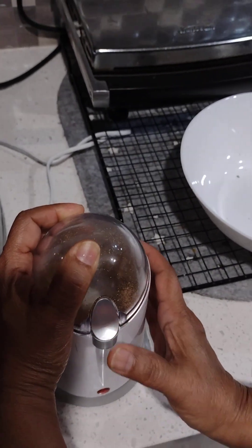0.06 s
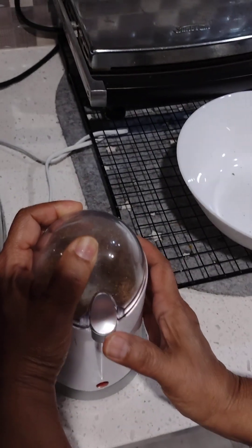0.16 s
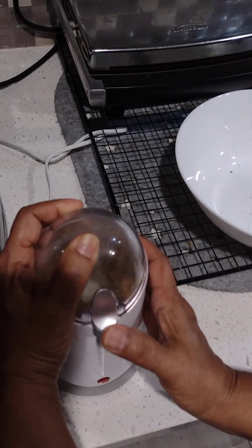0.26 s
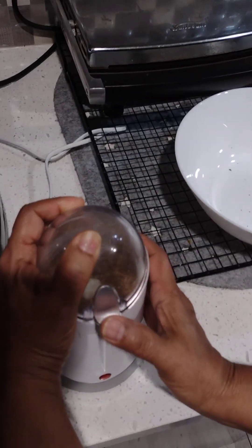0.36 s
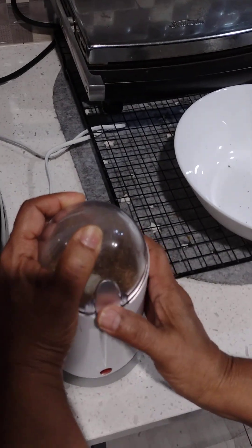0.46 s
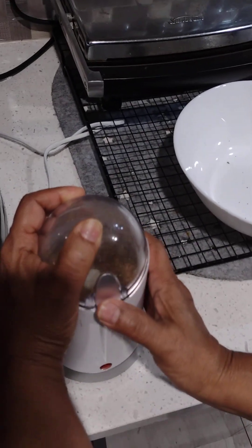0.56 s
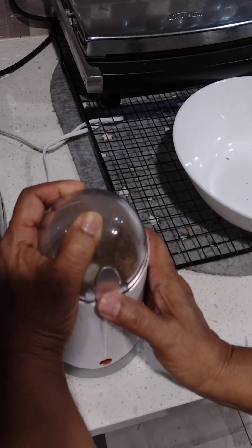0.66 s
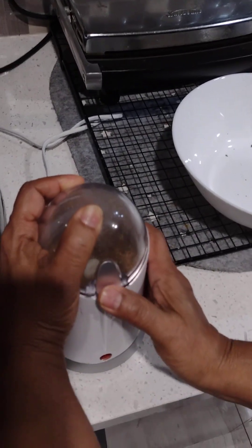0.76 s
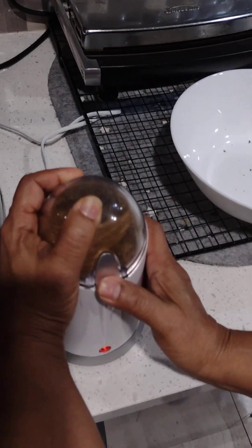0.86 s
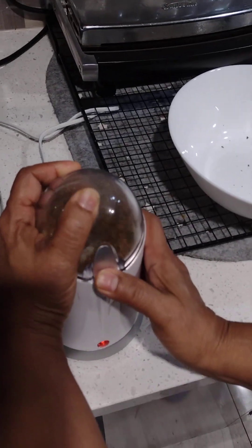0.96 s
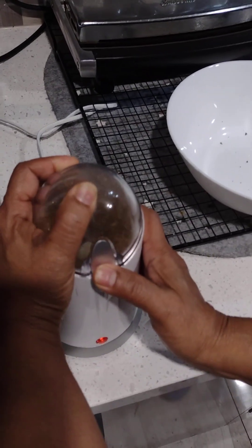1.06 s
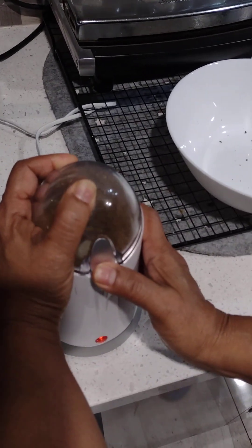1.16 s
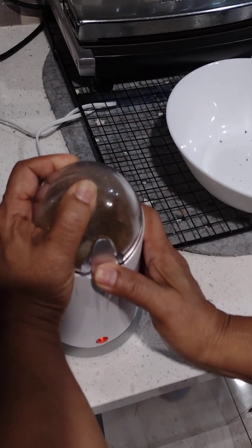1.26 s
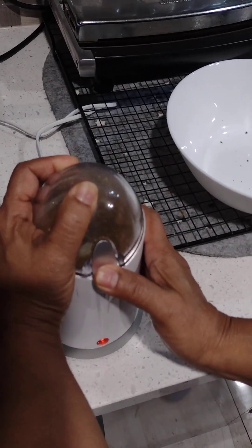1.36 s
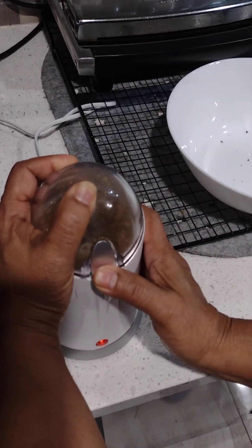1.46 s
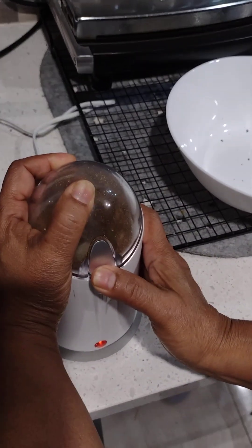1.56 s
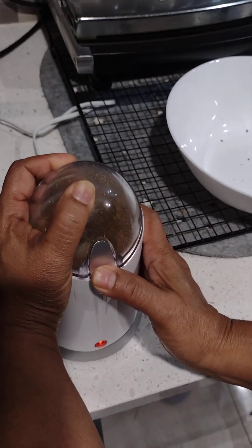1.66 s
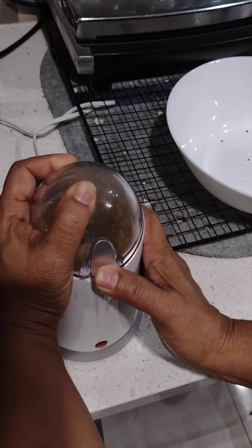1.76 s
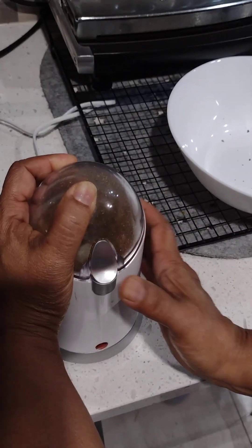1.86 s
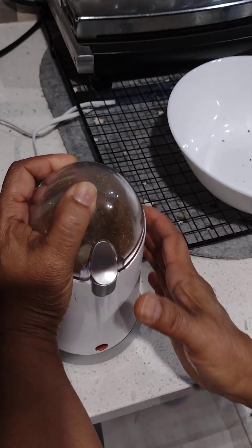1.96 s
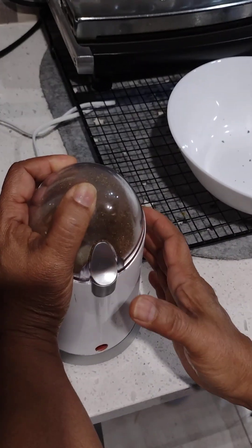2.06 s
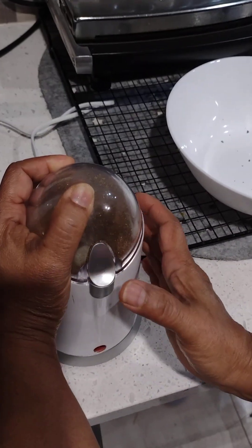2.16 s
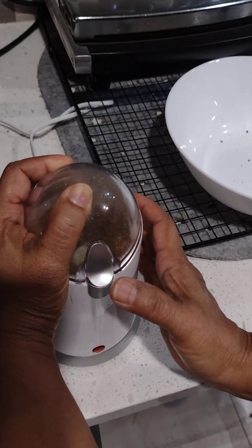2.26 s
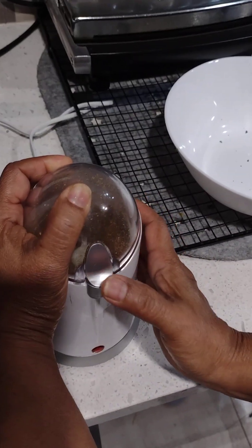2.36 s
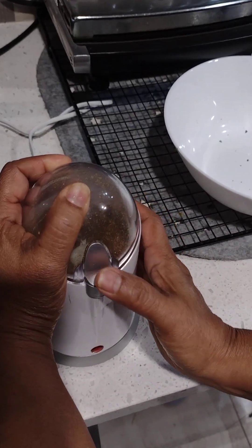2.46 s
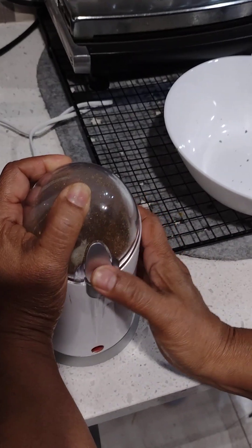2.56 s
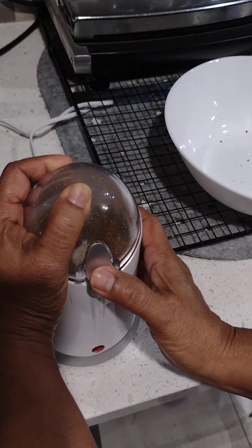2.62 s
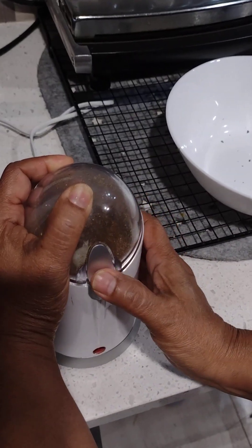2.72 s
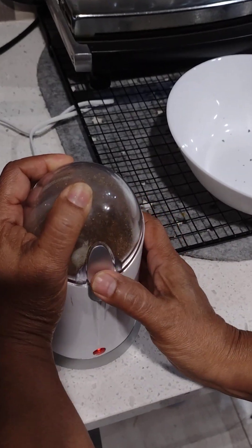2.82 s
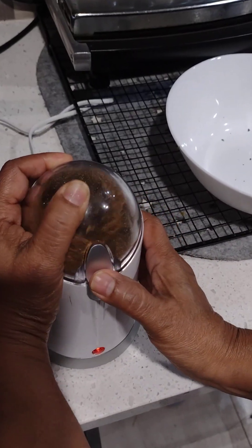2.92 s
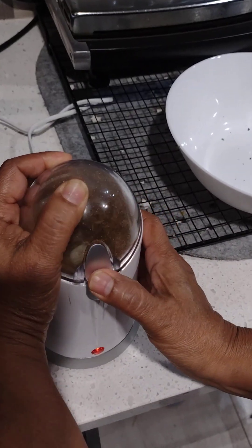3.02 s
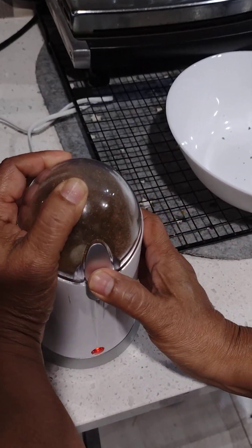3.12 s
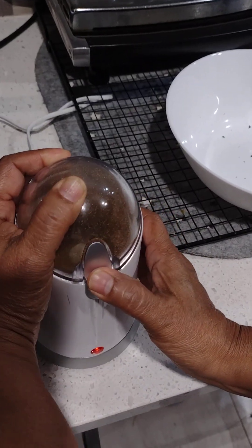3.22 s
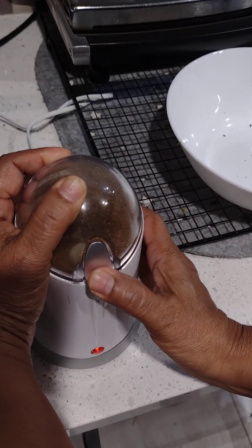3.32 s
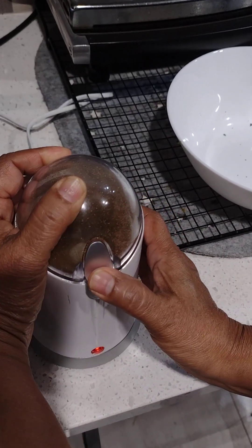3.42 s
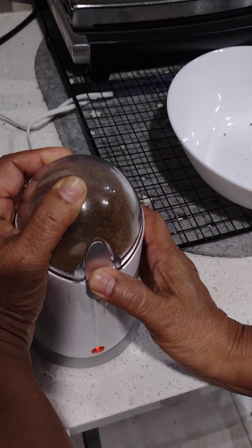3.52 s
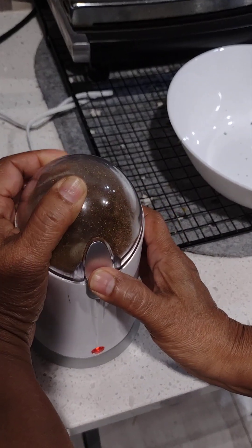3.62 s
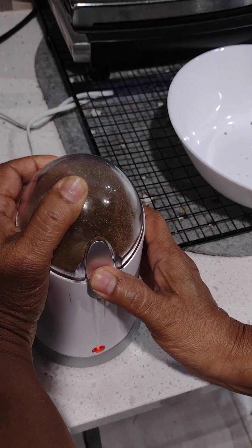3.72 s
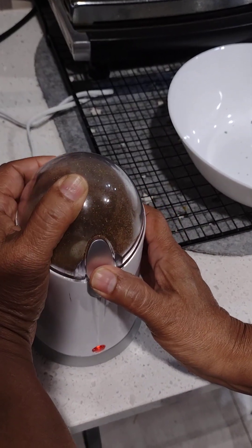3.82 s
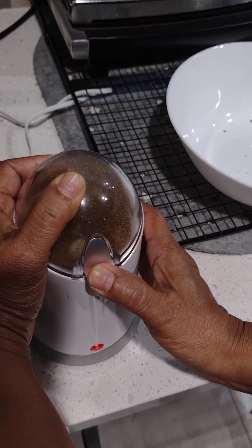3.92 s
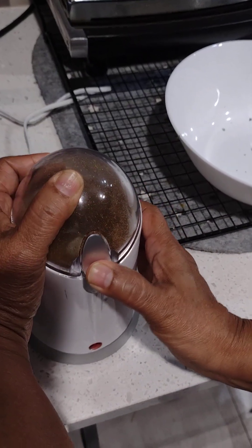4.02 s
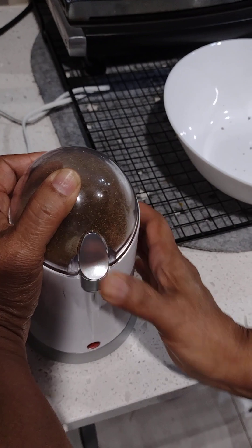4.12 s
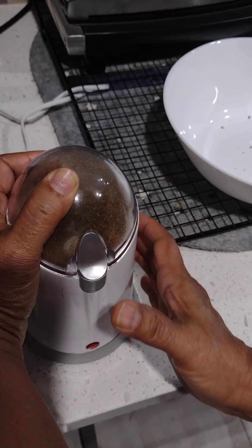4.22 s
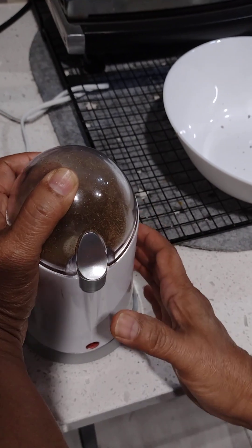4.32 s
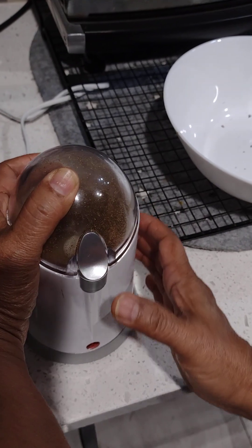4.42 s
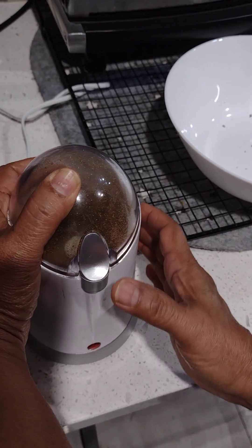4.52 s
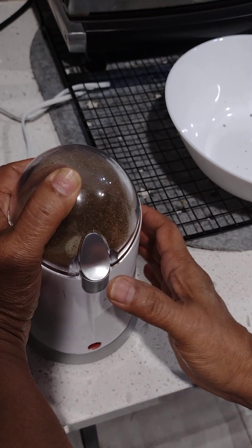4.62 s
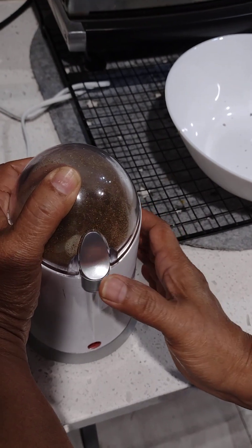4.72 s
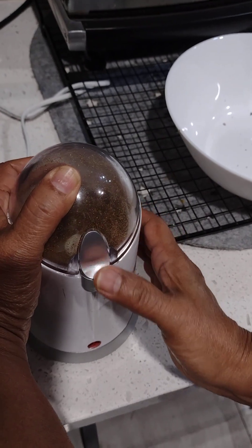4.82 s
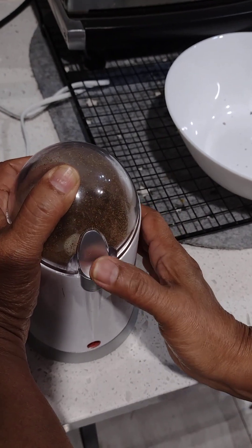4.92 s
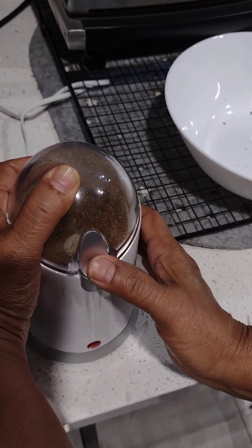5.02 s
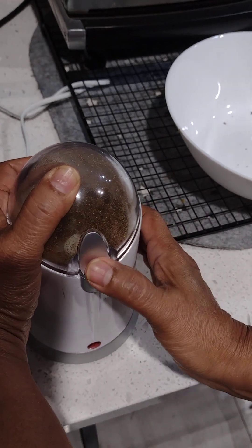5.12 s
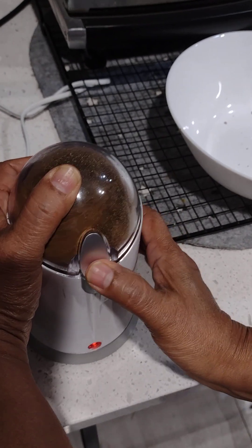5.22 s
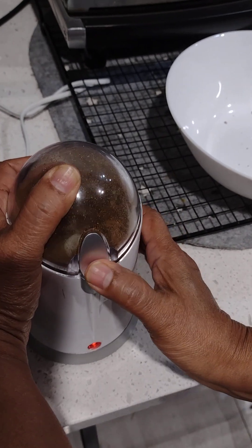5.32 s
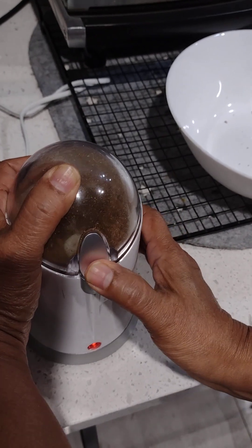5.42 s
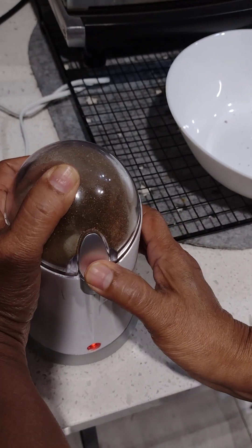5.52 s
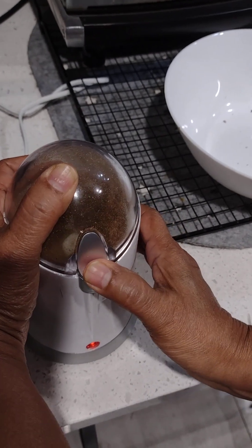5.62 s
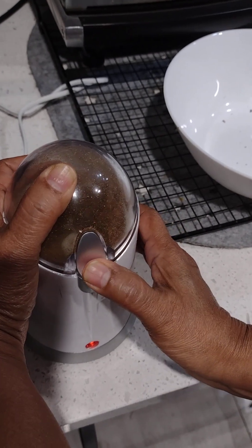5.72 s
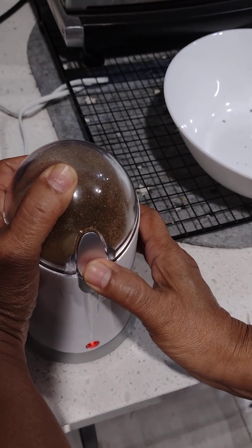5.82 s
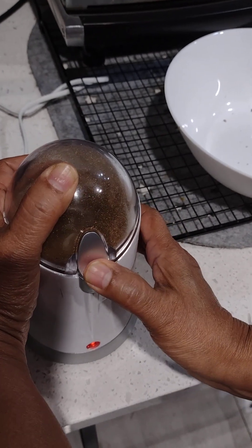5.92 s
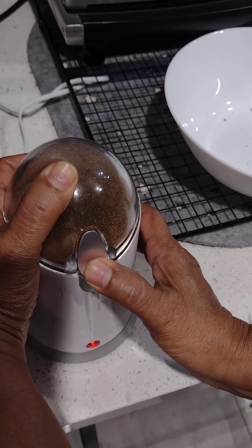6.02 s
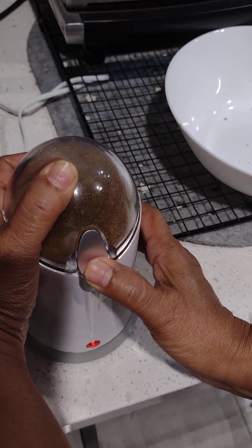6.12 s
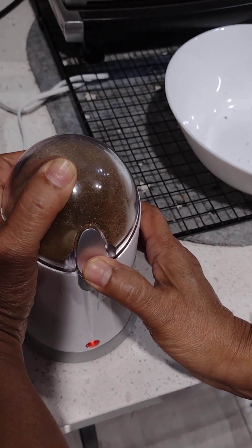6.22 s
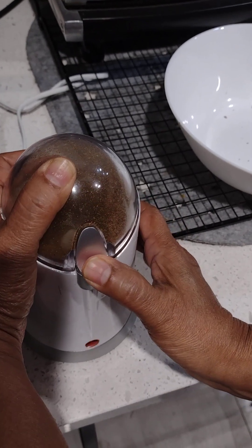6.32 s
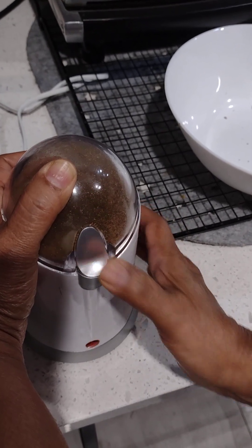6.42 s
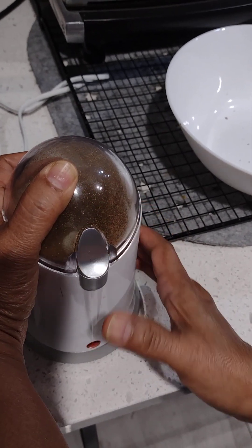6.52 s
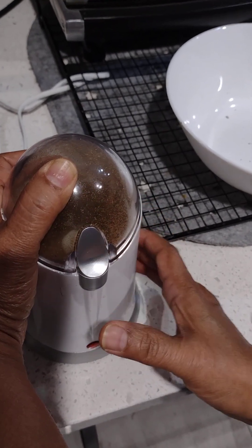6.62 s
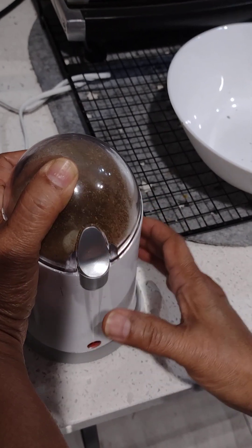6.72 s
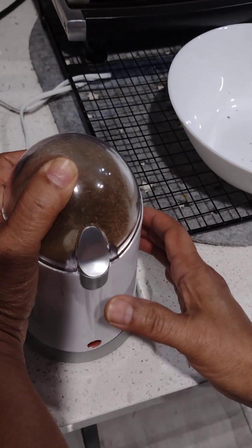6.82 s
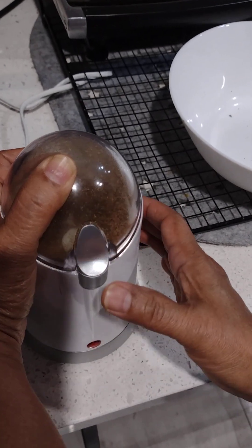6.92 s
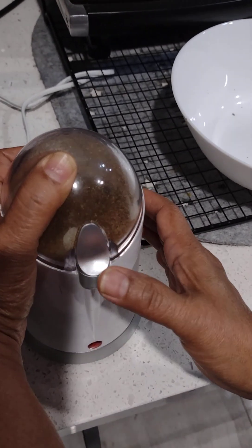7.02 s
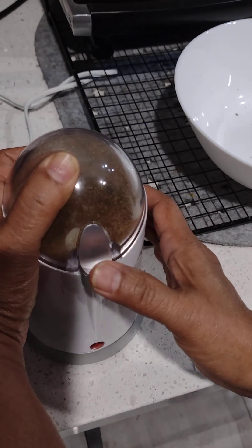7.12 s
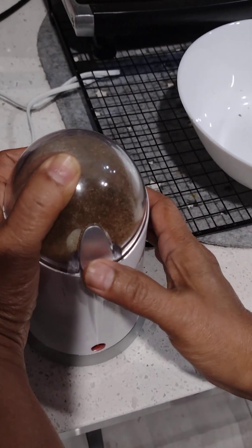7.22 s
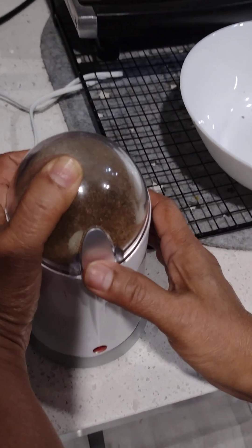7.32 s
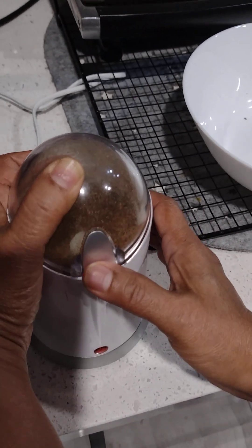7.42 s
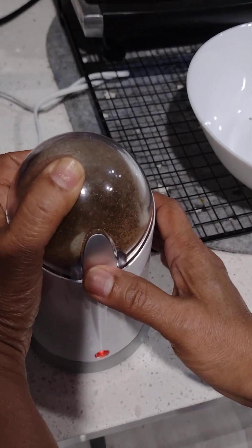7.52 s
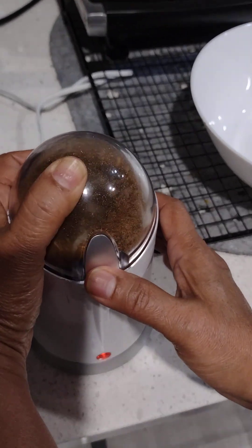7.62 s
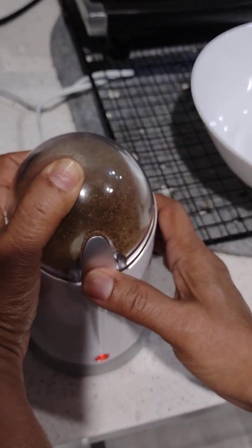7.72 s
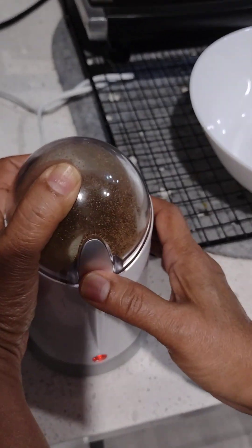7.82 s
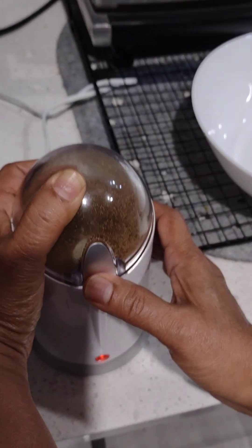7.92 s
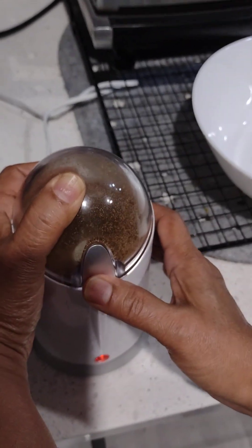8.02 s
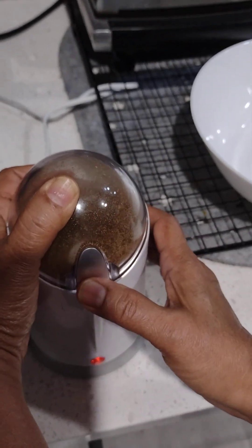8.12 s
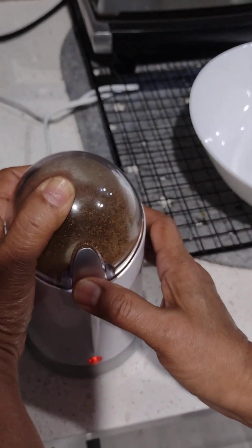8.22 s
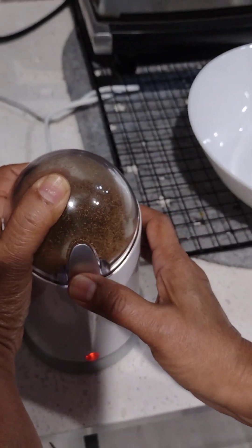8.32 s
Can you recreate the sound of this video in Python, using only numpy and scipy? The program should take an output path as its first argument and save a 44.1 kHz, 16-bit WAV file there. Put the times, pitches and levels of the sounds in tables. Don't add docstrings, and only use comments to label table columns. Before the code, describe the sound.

Close, slightly hollow stereo in a quiet kitchen with a short hard echo. At 0 s an earlier burst is already coasting down, coarse and loud with cracking lumps, stopping by about 0.4 s with a soft straggler. Faint room noise follows. At 0.9 s the grinder kicks in with knocks, spinning up within half a second to a buzzy motor whine, mains hum and gritty bright hiss, with several sharp cracks; power drops at 1.8 s and the pitch falls to a shuddering stop near 2.4 s. The second pulse runs 2.95 to 4.1 s, whining loudest, stopping around 4.7 s with small ticks. A light button rattle comes at 5.1 s. The third runs 5.3 to 6.4 s, finer and smoother, winding down to a clear last click near 6.85 s. The fourth starts at 7.6 s, with strong housing vibration, and is still at full speed when the sound ends around 8.4 s.

```python
import sys
import numpy as np
from scipy import signal
from scipy.fft import rfft, irfft, next_fast_len
from scipy.io import wavfile
from scipy.ndimage import uniform_filter1d

SR = 44100
rng = np.random.default_rng(int(sys.argv[2]) if len(sys.argv) > 2 else 0)


def undo_db(level):
    steps = np.asarray(level, float) / 20
    return 10 ** steps


def wav_record(signal):
    frames = np.transpose(np.atleast_2d(signal))
    bounded = np.clip(frames, -1, 1)
    quanta = np.round(bounded * 32767).astype(np.int16)
    wavfile.write(sys.argv[1], SR, quanta)


N = 368808
TIME = np.arange(N) / SR
MAINS_BEAT_HZ = 100


def rms_one(x):
    return x / np.sqrt(np.mean(x ** 2) + 1e-20)


def at_hz(points, hz, column=1):
    points = np.array(points)
    return np.interp(np.log(np.abs(hz) + 1), np.log(points[:, 0]), points[:, column])


def drift(rate_hz):
    r = np.exp(-2 * np.pi * rate_hz / SR)
    settle = 8000
    wander = signal.lfilter([1], [1, -2 * r, r * r], rng.standard_normal(N + settle))
    return rms_one(wander[settle:])


def colour(x, spectrum):
    cepstrum = irfft(np.log(undo_db(at_hz(spectrum, np.fft.rfftfreq(4096, 1 / SR)))))
    cepstrum = np.r_[cepstrum[0], 2 * cepstrum[1:2048], np.zeros(2048)]
    response = irfft(np.exp(rfft(cepstrum)))
    return rms_one(signal.fftconvolve(x, response)[:N])


def resonate(x, hz, width_hz):
    r = np.exp(-np.pi * width_hz / SR)
    top = np.array([1, 0, -1]) * (1 - r * r) / 2
    return signal.lfilter(top, [1, -2 * r * np.cos(2 * np.pi * hz / SR), r * r], x + 1e-18)


# on_s, off_s, top_speed_turns_per_s, spin_up_s
BURSTS = [
    (-1.3, -.275, 376, .19),
    (.885, 1.82, 377.5, .21),
    (2.951, 4.11, 375.5, .19),
    (5.272, 6.43, 377.5, .18),
    (7.592, 8.6, 378, .185),
]


def rotor():
    coast_rate, friction = 1.4, 186
    turns, power, which = np.zeros(N), np.zeros(N), np.zeros(N, int)
    for k, (on, off, top, lag) in enumerate(BURSTS):
        held = np.clip(TIME - on, 0, off - on)
        rise = top * (1 - .68 * np.exp(-held / lag) - .32 * np.exp(-held / .035))
        released = np.clip(TIME - off, 0, None)
        coast = (rise + friction) * np.exp(-coast_rate * released) - friction
        turns += np.maximum(coast, 0)
        power += (TIME > on + .007) & (TIME < off - .012)
        which[TIME > on] = k
    return turns, uniform_filter1d(power, size=600), which


# shake_at_full_speed_db, whine_db
BURST_DB = [
    (0, 0),
    (-8, -1.5),
    (-2, 1),
    (-0.5, -2),
    (2, 0.5),
]
# speed_turns_per_s, level_db
UNBALANCE = [(60, -73.5), (95, -63.5), (118, -53.5), (165, -50), (187, -37), (207, -43), (228, -44.5),
             (255, -32), (282, -42.5), (303, -49.5), (325, -38.5), (348, -48), (372, -43.5)]
# speed_turns_per_s, level_db
WHINE = [(285, -54.5), (303, -40.5), (325, -39), (345, -37), (372, -35.5)]
# pitch_hz, level_db
BODY = [(200, -10), (420, -8), (560, 1), (680, -1), (760, -2), (930, 6), (1050, -1), (1130, 0), (1480, 3),
        (1900, 0)]
# multiple_of_turns, mains_beats_added, level_db
ORDERS_DB = [(2, 0, -52.), (3, 0, -48.), (4, 0, -43.), (5, 0, -46.), (1, -1, -50.), (1, 1, -55.),
             (1, 2, -54.), (2, 1, -57.), (2, 2, -56.), (3, -1, -54.), (3, 1, -54.), (4, -1, -52.),
             (4, 1, -52.), (5, 1, -47.)]
# pitch_hz, level_db
HUM = [(100, -59), (200, -50.5), (300, -70)]


def motor(turns, power, which):
    shake_db, whine_db = np.array(BURST_DB)[which].T
    speed = turns / 375
    phase = 2 * np.pi * np.cumsum(turns * (1 + .0015 * drift(8))) / SR
    beat = 2 * np.pi * MAINS_BEAT_HZ * TIME

    unbalance_db = at_hz(UNBALANCE, turns) + 7.5 + 0.77 * drift(4.2) + shake_db * power * speed ** 8
    out = undo_db(unbalance_db) * np.sin(phase)
    for multiple, beats, level_db in ORDERS_DB:
        body_db = 2 * drift(6) + at_hz(BODY, multiple * turns + beats * MAINS_BEAT_HZ)
        tone = np.sin(multiple * phase + beats * beat + multiple)
        drive = power if beats or multiple > 3 else 2 - power
        out += undo_db(level_db + body_db) * speed ** 3.0 * drive * tone

    throb = (1 + .8 * np.cos(beat)) * np.sin(10 * phase + .6 * np.sin(beat))
    out += power * undo_db(at_hz(WHINE, turns) + whine_db + drift(11)) * throb
    hum = sum(undo_db(db + 0.64 * drift(9.0)) * np.sin(2 * np.pi * hz * TIME) for hz, db in HUM)
    hum = hum * (1 + 4.4 * (1 - speed))

    slowing_past = np.exp(-((turns - 135) / 45) ** 2) * (1 - power)
    shudder = undo_db(-21.5) * slowing_past * resonate(rng.standard_normal(N), 210, 40)
    rocking = resonate(resonate(rng.standard_normal(N), 66, 25), 70, 60)
    jolt = undo_db(-42.0) * np.minimum(turns / 150, 1) + undo_db(-34.5) * power * np.abs(1 - turns / 380) ** 2.9
    return out * (turns > 0) + jolt * rocking + shudder + power * hum


# speed_turns_per_s, cup_rumble_db, lid_hiss_db
CHURN = [(12, -122, -76), (46, -60, -64.5), (82.4, -36.5, -43.5), (125, -34.5, -36.5), (220, -32, -34),
         (405, -29.5, -32.5)]
# cup_db, lid_db, lull_after_first_throw_db
FINENESS = [
    (4, 5, 0),
    (0, 0.5, -2.5),
    (0, 0, -1),
    (-2, -2.5, -4),
    (0.5, -3, -4.5),
]
# time_s, level_db
LOAD = [(0, 0), (1.2, 2), (1.56, 2), (1.61, -4), (2.0, 0.5), (2.15, 4), (2.2, 2), (2.26, 2), (3.2, 0.5),
        (3.68, 1), (3.76, -1.5), (3.86, 1), (4.42, -0.5), (4.58, 1), (5.6, 2.5), (6.4, 2), (6.9, 1),
        (8.36, 0)]
# start_s, peak_db, housing_knock_db, brittleness_db
CRACKS = [(0.0363, -14, -14.5, -6), (0.0817, -8.5, -22.5, -10), (0.1173, -2.5, -29.5, -14),
          (1.047, -24, -20, -2.5), (1.1021, -9, -17, -6), (1.2003, -10.5, -15.5, -8),
          (1.271, -11.5, -34.5, -10.5), (1.355, -22.5, -17, -4.5), (1.5, -20.5, -24.5, -16),
          (1.553, -16, -16, -14), (1.5667, -4.5, -21.5, -8.5), (2.0102, -15, -26.5, -13.5),
          (2.1216, -11.5, -21.5, -19.5), (2.2383, -8.5, -14, -8.5), (2.2577, -11, -12.5, -20.5),
          (3.0108, -14.5, -22.5, -1), (3.1381, -5.5, -27.5, -9.5), (3.4439, -8.5, -42, -14),
          (3.561, -9, -27, -12), (3.904, -8.5, -32, -12), (3.9738, -18.5, -16, 0), (4.2725, -15, -39, -5),
          (4.4595, -11, -21, -12), (4.5858, -19, -8, -23.5), (5.5632, -17, -14, -4),
          (5.924, -19, -22, -12.5), (6.403, -8, -22.5, -12.5), (6.4762, -12.5, -18, -13.5),
          (6.9182, -11.5, -18, -13.5), (8.1723, -11.5, -13, -11.5)]


def churn(turns, which):
    lull_at_s, lull_width_s = .11, .05
    bite_turns, bite_rise_s, bite_fade_s = 90, 0.019, 0.05
    spray_db, spray_s = 4, 0.013
    cup_db, lid_db, lull_db = np.array(FINENESS)[which].T
    since = TIME - np.array(BURSTS)[which, 0]
    load_s, load_db = np.transpose(LOAD)
    lull = np.exp(-((since - lull_at_s) / lull_width_s) ** 2)
    shared_db = np.interp(TIME, load_s, load_db) + lull_db * lull
    turns = turns + bite_turns * (1 - np.exp(-since / bite_rise_s)) * np.exp(-since / bite_fade_s)

    hits = np.zeros(N)
    hits[[int(row[0] * SR) for row in CRACKS]] = undo_db(spray_db + np.array(CRACKS)[:, 1])
    spray = signal.lfilter([1], [1, -np.exp(-1 / (spray_s * SR))], hits + 1e-18)
    cup_db = cup_db + shared_db + at_hz(CHURN, turns)
    lid_db = lid_db + shared_db + at_hz(CHURN, turns, column=2) + 10 * np.log10(1 + spray)
    return cup_db, lid_db


def grains(per_s, spread_db, clump_db):
    sizes = undo_db(spread_db * np.minimum(rng.exponential(1, N), 6)) * rng.choice([-1, 1], N)
    arrives = rng.random(N) < per_s * undo_db(clump_db * drift(30)) / SR
    return rms_one(sizes * arrives)


# pitch_hz, level_db_per_hz
CUP_COLOUR = [(40, -46), (110, -30), (185, -10.5), (300, -12.5), (570, -6), (750, -13), (1150, -5.5),
              (1500, 1), (1950, 3.5), (2500, -13.5), (3000, -20)]
# pitch_hz, level_db_per_hz
LID_COLOUR = [(1800, -26.5), (2600, 1.5), (3700, 3.5), (5000, 3), (6500, -2), (8500, 4.5), (10000, 4.5),
              (12000, 0), (15500, -5.5)]


def spice(turns, power, cup_db, lid_db):
    surge = undo_db(.5 * drift(28) + drift(59))
    coarse = grains(1500, spread_db=2.5, clump_db=8.0)
    chips = np.abs(grains(120, spread_db=3.0, clump_db=3.0))
    spray = signal.lfilter([1], [1, -np.exp(-1 / (.006 * SR))], chips)
    powder = rng.standard_normal(N) * (1 + rms_one(spray) / 4)

    throb = 1 + 0.036 * power * np.cos(2 * np.pi * MAINS_BEAT_HZ * TIME)
    cup = colour(0.43 * coarse + rng.standard_normal(N) + 0.4 * powder, CUP_COLOUR)
    cup = cup * undo_db(cup_db - 7.0 + 1.5 * drift(36)) * throb
    lid = colour(1.1 * coarse + powder, LID_COLOUR) * undo_db(lid_db + 0.74)
    treble = signal.sosfilt(signal.butter(1, 9000, "high", fs=SR, output="sos"), lid)
    lid = lid - .5 * np.clip(1 - turns / 250, 0, 1) * treble
    ring = undo_db(cup_db + 12) * np.clip(1 - turns / 300, 0, 1) * resonate(powder, 1520, 76)
    return surge * (cup + lid + ring)


# after_press_s, peak_db, housing_knock_db, brittleness_db
FIRST_HITS = [
    (.012, -33, -6, -17),
    (.022, -21, -5, -4.5),
    (.036, -19, -7, -13.5),
    (.062, -18.5, -11, -12.5),
]
FIRST_HITS_DB = [8, 3, -2, -1]
# start_s, peak_db, housing_knock_db,
# brittleness_db
STRAGGLERS = [
    (0.3696, -36, -6.5, -17),
    (4.567, -26, -14, -15),
    (4.7553, -37.5, -15, -10),
    (4.870, -51, -4, -18),
    (4.938, -53, -5, -13),
    (5.1128, -52, -6, -13),
    (6.8454, -17.5, -13, -10.5),
    (6.8715, -30, -6, -18),
]


def lumps(lid_db):
    first = []
    for press, press_db in zip(BURSTS[1:], FIRST_HITS_DB):
        for after, peak_db, knock_db, brittle_db in FIRST_HITS:
            first.append((press[0] + after, peak_db + press_db, knock_db, brittle_db))

    count = 110
    s = (np.arange(count) + rng.random(count)) * (N - 2) / SR / count
    hiss_db = lid_db[(s * SR).astype(int)]
    size, knock, brittle = rng.standard_normal((3, count))
    peak_db = hiss_db + 12.5 + 4 * np.minimum(size, .5)
    peak_db = np.where(hiss_db > -60, peak_db, -99)
    chips = [s, peak_db, -17 + 3.0 * knock, -15.5 + 2 * brittle]
    return np.vstack([CRACKS, first, STRAGGLERS, np.transpose(chips)])


# pitch_hz, width_hz, level_db
LID = [(3347, 100, -5), (3710, 880, -5.5), (4550, 450, -2.5), (6000, 370, -21), (8670, 870, 0),
       (10500, 1600, -7.5), (12800, 4200, -11)]
# pitch_hz, width_hz, level_db
HOUSING = [(197, 50, 0), (577, 66, -2.5), (942, 180, -5), (1450, 420, -2.5), (1905, 200, -7)]


def cracks(rows):
    s, peak_db, knock_db, brittle_db = np.transpose(rows)
    at, out = np.round(s * SR).astype(int), np.zeros(N)
    mix_db = rng.normal(0, 2, (len(at), len(LID) + len(HOUSING)))
    burst = np.exp(-TIME[:1500] / .0015) + 0.36 * np.exp(-TIME[:1500] / 0.012)
    for k, (hz, width_hz, db) in enumerate([*LID, *HOUSING]):
        if k >= len(LID):
            share_db = knock_db + 15.5
        elif hz > 7000:
            share_db = brittle_db + 9.5
        else:
            share_db = -1.2 * brittle_db - 13.0
        hits = np.zeros(N)
        hits[at] = undo_db(peak_db + db + mix_db[:, k] + share_db)
        splinters = signal.oaconvolve(hits, burst)[:N] * np.tanh(rng.standard_normal(N))
        out += resonate(splinters + 3.5 * hits, hz, width_hz)
    return out


# pitch_hz, level_db_per_hz
BUTTON_COLOUR = [(200, -1), (900, 15.5), (2000, -20), (3900, 2.5), (6000, -5), (12000, -17)]


def button():
    touch_s, fade_s = 5.112, 0.015
    since = np.clip(TIME - touch_s, 0, None)
    rattle = colour(rng.standard_normal(N), BUTTON_COLOUR)
    return undo_db(-47.0) * (since > 0) * np.exp(-since / fade_s) * rattle


def kitchen(x):
    t60_s = 0.38
    time = TIME[:SR // 2]
    tail = rng.standard_normal(SR // 2) * undo_db(-60 * time / t60_s) * (time > .004)
    tail = signal.lfilter([.4], [1, -.6], tail)
    return signal.fftconvolve(x, tail / np.sqrt(np.sum(tail ** 2)))[:N]


# pitch_hz, level_db_per_hz
ROOM_COLOUR = [(40, -13.5), (130, 2), (255, 11.5), (320, 1), (700, 2), (1400, -7.5), (3000, -20),
               (15000, -29)]


def room_tone():
    return undo_db(-59 + 2 * drift(6.5)) * colour(rng.standard_normal(N), ROOM_COLOUR)


def scene():
    turns, power, which = rotor()
    cup_db, lid_db = churn(turns, which)
    grinder = motor(turns, power, which) + spice(turns, power, cup_db, lid_db)
    grinder = grinder + cracks(lumps(lid_db)) + button()
    near = grinder + undo_db(-10) * kitchen(resonate(grinder, 1500, 6000)) + room_tone()
    treble = signal.butter(2, 5000, "high", fs=SR, output="sos")
    apart = signal.sosfilt(treble, [kitchen(near), kitchen(near)])
    return near + undo_db(-21.0) * apart


def low_pass(x):
    return signal.sosfilt(signal.butter(12, 15960, fs=SR, output="sos"), x)


# pitch_hz, left_direct_db, left_late_db, right_late_db
PATHS = [(700, -3, -26.5, -32.5), (1060, -3.5, -33, -24.5), (1380, -5, 2, -31), (2300, 2, -4, 1.6),
         (4930, -4.5, -4.5, -5.5), (7500, -3, -9, 1), (10500, -6.5, -6.5, -6.5), (12600, -2.5, -2, -7),
         (15500, -10.5, -9, -20.5)]


def record(dry):
    left_late_s, right_late_s, right_lead_s = .000389, .000422, .0000093
    size = next_fast_len(N + 4096)
    hz = np.fft.rfftfreq(size, 1 / SR)
    left_direct, left_late, right_late = (undo_db(at_hz(PATHS, hz, column=k)) for k in range(1, 4))
    left = left_direct - left_late * np.exp(-2j * np.pi * hz * left_late_s)
    right = 1 - right_late * np.exp(-2j * np.pi * hz * right_late_s)
    right = right * np.exp(2j * np.pi * hz * right_lead_s)
    combed = irfft(rfft(dry, size) * [left, right], size)[:, :N]
    cut = signal.sosfilt(signal.ellip(10, .5, 45, 15730, fs=SR, output="sos"), combed)
    cut = signal.sosfilt(signal.butter(1, 40, "high", fs=SR, output="sos"), cut)
    return low_pass(cut)


dry = scene()
out = record(dry)
wav_record(out)
```